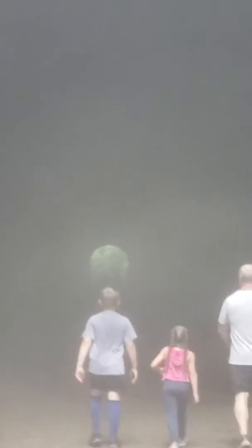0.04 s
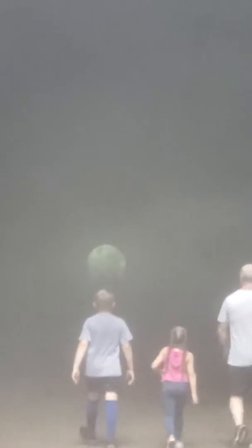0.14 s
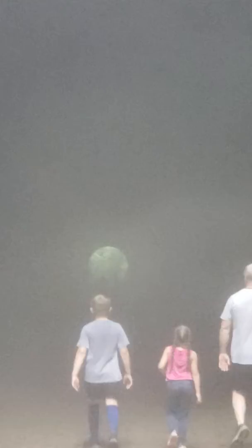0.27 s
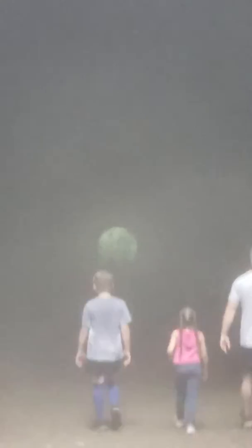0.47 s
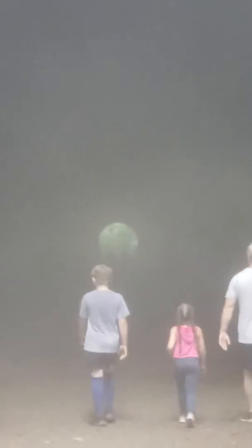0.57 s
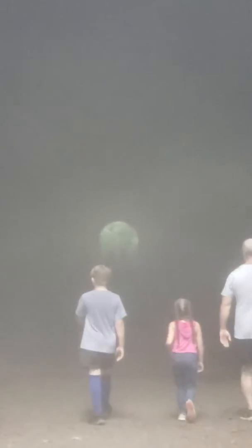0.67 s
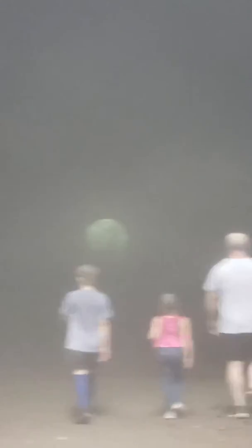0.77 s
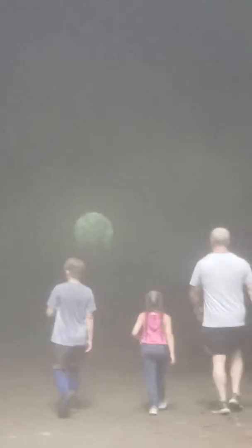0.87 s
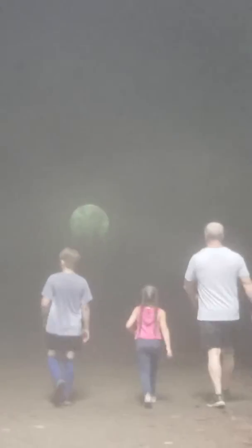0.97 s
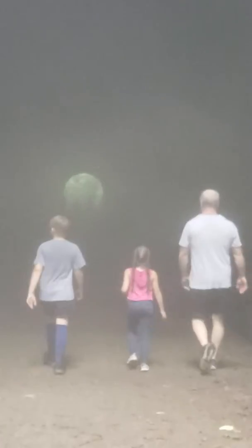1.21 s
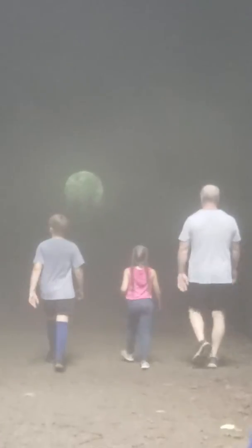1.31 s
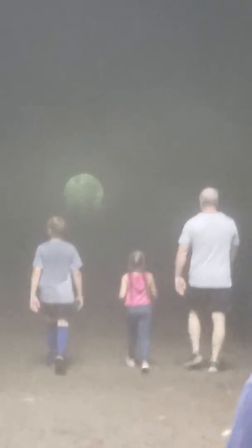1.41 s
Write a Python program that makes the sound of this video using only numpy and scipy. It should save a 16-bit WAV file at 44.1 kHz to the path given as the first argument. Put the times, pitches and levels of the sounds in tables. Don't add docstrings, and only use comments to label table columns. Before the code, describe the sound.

Soles drag and crunch over gravel in a tunnel, with soft low wind bumps

```python
import sys
import numpy as np
from scipy import signal
from scipy.fft import rfft, irfft
from scipy.io import wavfile

SR = 44100
rng = np.random.default_rng(int(sys.argv[2]) if len(sys.argv) > 2 else 0)


def attenuation_scalar(level_db):
    decades = np.asarray(level_db, float) / 20
    return 10 ** decades


def transcribe(signal):
    frames = np.atleast_2d(signal).T
    limited = np.clip(frames, -1, 1)
    pcm = np.round(limited * 32767).astype(np.int16)
    wavfile.write(sys.argv[1], SR, pcm)


N = 63945
T = np.arange(N) / SR
HZ = np.fft.rfftfreq(N, 1 / SR)


def evened(x):
    return x / np.sqrt(np.mean(x ** 2) + 1e-20)


def colour(x, gain):
    return irfft(rfft(x) * gain, N)


def low_cut(pressure):
    cut_hz, q, drift_hz = 55.2, 2.07, 43
    w = 2 * np.pi * cut_hz
    resonant = signal.bilinear([1, 0, 0], [1, w / q, w ** 2], SR)
    plain = signal.bilinear([1, 0], [1, 2 * np.pi * drift_hz], SR)
    return signal.lfilter(*plain, signal.lfilter(*resonant, pressure))


def air_noise(rolloff):
    return evened(colour(rng.standard_normal(N), HZ / (HZ + 30) * rolloff))


def draught():
    # t/s, left level/dB, right level/dB
    draught_levels = [(0, -52, -58), (.06, -53, -50.5), (.1, -52, -53), (.14, -49, -62), (.18, -81, -49),
                      (0.399, -100, -44.5), (0.438, -59, -44), (0.551, -56.5, -52), (.7, -43, -50.5),
                      (.83, -53, -50.5), (.95, -60, -51.5), (.99, -71, -56), (1.13, -70, -59),
                      (1.2, -50.5, -52.5), (1.26, -61, -46.5), (1.3, -76, -48.5), (1.45, -83, -49)]
    corner_hz = 82
    s, *level_db = np.transpose(draught_levels)
    lumps = [air_noise(1 / (1 + (HZ / corner_hz) ** 3.5)) for _ in range(2)]
    return np.array([attenuation_scalar(np.interp(T, s, db)) * x for db, x in zip(level_db, lumps)])


def gusts():
    # start t/s, length/s, level/dB
    gust_rows = [
        (.212, 0.06, -34),
        (0.33, 0.15, -56),
        (0.436, 0.0098, -44),
        (0.003, 0.05, -59.5),
        (0.241, 0.027, -42),
        (0.78, 0.095, -57),
    ]
    corner_hz, top_hz = 202, 1900
    out = np.zeros(N)
    for start, length, db in gust_rows:
        u = np.clip((T - start) / length, 0, 1)
        roar = air_noise(1 / (1 + (HZ / corner_hz) ** 1.57) / (1 + (HZ / top_hz) ** 3))
        out += attenuation_scalar(db) * np.sin(np.pi * u ** 1.5).clip(0) ** 0.28 * roar
    return out


def puffs():
    # t/s, peak level/dB, width/ms, sign
    left_puffs = [(.046, -44.5, 1.08, 1), (.083, -65, 4.8, -1), (.432, -49, 2.8, -1), (.536, -43, 1.4, 1),
                  (.6, -32, 7, 1), (.638, -41, 3.6, 1), (.688, -31.5, 3.3, -1), (.733, -31, 2.4, -1),
                  (.786, -38.5, 2.5, -1), (.81, -35, 2.2, -1), (.873, -42, 4.25, 1), (.897, -49, 3.6, 1),
                  (.926, -55, 5.7, 1), (1.174, -47, 3.8, 1), (1.193, -55, 5.4, 1), (1.206, -39.5, 5.4, -1)]
    # t/s, peak level/dB, width/ms, sign
    right_puffs = [(.0232, -37, 2.2, 1), (0.0338, -34, 2.6, 1), (.0605, -38, 2.8, 1), (0.126, -36, 3, 1),
                   (.1555, -40, 2.5, 1), (0.1742, -36, 2.8, 1) , (.219, -33, 2.5, 1), (.226, -29, 2.45, 1),
                   (.253, -26.5, 1.54, 1), (0.2641, -19.5, 3.5, 1),
                   (.2676, -27, 1.6, -1) , (0.283, -25.5, 7.3, 1), (0.358, -33.5, 2.6, -1),
                   (0.368, -29, 4, -1), (0.395, -40, 4.3, 1), (0.4324, -17.3, 4.7, 1),
                   (.4325, -27, 1.1, -1), (0.4373, -20, 2.9, -1),
                   (.437, -25.5, 1.3, -1) , (0.48, -27, 5.1, 1), (0.691, -41, 5.4, 1), (0.709, -40, 2.6, 1),
                   (0.751, -34, 2., 1), (0.769, -37.5, 2.8, 1), (.8, -33.5, 1.7, 1), (0.816, -34, 4, 1),
                   (0.83, -30, 6.3, 1), (1.01, -33.5, 2.3, 1), (1.03, -41, 4., 1), (1.08, -35.5, 2.8, 1),
                   (1.085, -46, .9, -1), (1.182, -38.5, 4.4, 1), (1.1902, -44, .35, 1),
                   (1.2205, -40, 2.6, -1), (1.2232, -39, .9, 1), (1.258, -38, 9.2, -1)]
    push, lead_s = 1.37, .0012
    out = np.zeros((2, N))
    for port, rows in enumerate((left_puffs, right_puffs)):
        for at, db, ms, sign in rows:
            bell = np.exp(-((T - at + lead_s) * 1000 / ms) ** 2)
            out[port] -= np.sign(sign) * push * attenuation_scalar(db) * bell
    return out


def wind():
    pressure = draught() + puffs()
    pressure[1] += gusts()
    return low_cut(pressure)


def far_walkers():
    level_db, corner_hz = [[-55], [-55.5]], 1500
    bright = HZ ** 3 / (HZ ** 3 + corner_hz ** 3)
    gain = bright / (1 + (HZ / 11000) ** 2) + .07
    wash = [evened(colour(x, gain)) for x in rng.standard_normal((2, N))]
    return attenuation_scalar(level_db) * np.array(wash)


def self_noise():
    level_db = -84
    return attenuation_scalar(level_db) * evened(colour(rng.standard_normal((2, N)), 1 / (1 + (HZ / 400) ** 2)))


def grit():
    grains_per_s, spread_db = 12000, 1.8
    on, size, sign = rng.random(N), rng.exponential(1, N), rng.standard_normal(N)
    return (on < grains_per_s / SR) * attenuation_scalar(spread_db * np.minimum(size, 4)) * sign


def envelope(start, length, rise):
    sag_db, tail_db_per_s = -5, 300
    u = (T - start) / length
    tail = np.maximum(T - start - length, 0) * tail_db_per_s
    return np.sin(np.pi / 2 * np.clip(u / rise, 0, 1)) ** 2 * attenuation_scalar(sag_db * np.clip(u, 0, 1) - tail)


def scuff(start, length, db, hz, fizz_db, rise, octaves):
    hump = np.exp(-.5 * (np.log2(HZ / hz + 1e-6) / octaves) ** 2)
    fizz = attenuation_scalar(fizz_db) * HZ ** 2 / (HZ ** 2 + 1220.0 ** 2)
    grains = evened(colour(np.array([grit(), grit()]), hump + fizz))
    return attenuation_scalar(db) * envelope(start, length, rise) * grains


def crunches():
    # start t/s, length/s, level/dB, centre f/Hz, wide fizz level/dB
    crunch_rows = [(.05, 0.013, -46.5, 4760, 33), (.11, 0.15, -53.5, 4900, -6), (.19, 0.059, -47, 3700, -9),
                   (.35, 0.091, -50, 3530, -6.5), (.45, 0.076, -44.5, 6550, -4),
                   (.528, 0.072, -41.5, 3280, 6.5), (.635, 0.052, -46, 3840, -6),
                   (.75, 0.13, -50.5, 3850, 0), (.934, 0.0053, -48, 4600, -11),
                   (1.059, 0.01, -49.5, 4300, -12), (1.09, 0.037, -64, 4660, -20),
                   (1.165, 0.064, -47, 4430, -1), (1.198, 0.043, -47.5, 4540, -18),
                   (1.24, 0.073, -52, 6550, 7), (1.299, 0.0054, -44.5, 3070, -32),
                   (1.307, 0.015, -47, 2940, -10), (1.33, 0.075, -47, 5000, 14),
                   (1.378, 0.052, -55, 2480, -14)]
    return sum(scuff(*row, rise=.27, octaves=0.71) for row in crunch_rows)


def snaps():
    # t/s, peak level/dB, ring f/Hz, cycles to the peak
    stone_rows = [(.0546, -39, 4000, .3), (.1014, -44, 2400, .4), (.2009, -38, 4000, .7),
                  (.2185, -38, 3600, .3), (.301, -51, 2750, 5), (.3495, -42, 6900, .7),
                  (.375, -38, 3100, .5), (.4573, -38, 4500, .35), (.4642, -33, 6200, .5),
                  (.5233, -39, 3500, .4), (.5923, -39, 3200, .35), (.6706, -41, 1700, .4),
                  (.686, -38, 1900, .4), (.7051, -38, 2400, .6), (.7582, -38, 3000, .4),
                  (.7918, -37, 2500, .5), (.8361, -42, 2400, .5), (.9368, -37.5, 4800, .9),
                  (.9447, -42, 4500, .7), (1.0618, -38, 4000, .35), (1.0638, -43, 2800, .5),
                  (1.0998, -43, 5000, .5), (1.1952, -44, 4800, .5), (1.2079, -30.5, 4600, .55),
                  (1.2263, -35, 4200, .5), (1.234, -33, 4300, .45), (1.2691, -46, 1700, .4),
                  (1.3013, -33, 3000, .5), (1.3044, -31, 2400, .35), (1.3135, -36, 3000, .9),
                  (1.3205, -36, 2600, .35), (1.3225, -35, 3200, .4), (1.319, -54, 560, 1.2),
                  (1.335, -57, 480, 1.2), (1.372, -43, 1100, .4), (1.3863, -36, 2500, 1.1),
                  (1.405, -41, 2000, .4), (1.42, -41, 2300, .8)]
    # t/s, peak level/dB, ring f/Hz, cycles to the peak
    clod_rows = [(.1012, -55, 650, .6), (.64, -54, 620, .8), (.6848, -44, 1000, .3), (.7255, -49, 800, .7),
                 (.737, -48, 1100, .7), (.7565, -43, 1150, .5), (.762, -46, 1300, .6),
                 (.7695, -46, 900, .8), (.775, -47, 1300, .6), (.7845, -47, 1300, .6), (.791, -44, 850, .4),
                 (.8035, -45, 750, .8)]
    cut_hz = 480
    out, t = np.zeros(N + 900), np.arange(900) / SR
    for s, db, hz, cycles in (*stone_rows, *clod_rows):
        u = t * hz / max(cycles, .2)
        ring = np.sin(2 * np.pi * hz * t) * u * np.exp(-u)
        out[round(s * SR) - 8:][:900] -= attenuation_scalar(db) * 2.9 * ring
    return colour(out[:N], HZ ** 3 / (HZ ** 3 + cut_hz ** 3))


def drags():
    # start t/s, length/s, level/dB, centre f/Hz
    drag_rows = [
        (0.058, 0.2, -48, 1260),
        (0.59, 0.19, -47, 1340),
        (0.731, 0.093, -47.5, 1200),
        (1.216, 0.16, -46.5, 1720),
        (1.292, 0.094, -47.5, 1300),
        (1.371, 0.1, -48, 1300),
        (0.92, 0.035, -48, 2350),
        (0.49, 0.13, -67, 280),
        (1.315, 0.033, -54.5, 760),
    ]
    return sum(scuff(*row, fizz_db=-4.5, rise=.3, octaves=0.99) for row in drag_rows)


def tunnel(x):
    t60_s, wet_db, length = 0.38, -8.5, SR // 2
    taps = np.zeros((2, length))
    at = np.arange(150, length - 20, 20)
    at = at + rng.integers(0, 20, (2, len(at)))
    np.put_along_axis(taps, at, rng.choice([-1., 1.], at.shape), 1)
    taps *= attenuation_scalar(-60 * np.arange(length) / SR / t60_s)
    taps /= np.linalg.norm(taps[0])
    return attenuation_scalar(wet_db) * signal.fftconvolve(x[None], taps, axes=1)[:, :N]


def port_gain(points):
    f, db = np.transpose(points)
    return attenuation_scalar(np.interp(np.log(HZ + 1), np.log(f), db))


def through_ports(air):
    # f/Hz, level/dB
    left_port = [(200, 21), (1000, 4), (5800, -1.5), (7400, 2.5), (7850, -3), (8600, -8.5), (11500, -3.5),
                 (15500, -5)]
    # f/Hz, level/dB
    right_port = [(250, 25.5), (700, 2), (1700, -8), (3900, -15.5), (4900, -28), (5800, -21.5), (8300, -43),
                  (15000, -26.5)]
    slot_hz, slot_width_hz, slot_db = 10480, 1300, -17
    slot = attenuation_scalar(slot_db) * np.exp(-((HZ - slot_hz) / slot_width_hz) ** 4)
    return colour(air, np.array([port_gain(left_port), port_gain(right_port) + slot]))


def scene():
    same, stone_share, lead = .28, .75, 14
    near, other = drags() + crunches()
    stones = snaps()
    left = near + stones
    right = same * near + np.sqrt(1 - same ** 2) * other + stone_share * stones
    direct = np.array([left, np.roll(right, -lead)])
    air = direct + tunnel(left) + far_walkers()
    return through_ports(air) + wind() + self_noise()


def top_cut(x):
    return signal.sosfilt(signal.butter(12, 16300, fs=SR, output="sos"), x)


def record(dry):
    edge_hz = 15790
    mix = colour(dry, HZ < edge_hz)
    return top_cut(mix)


dry = scene()
out = record(dry)
transcribe(out)
```